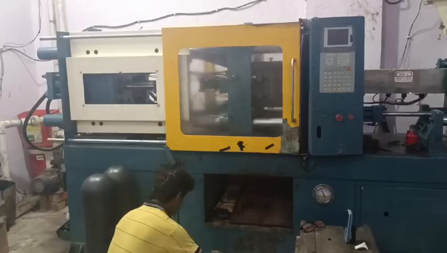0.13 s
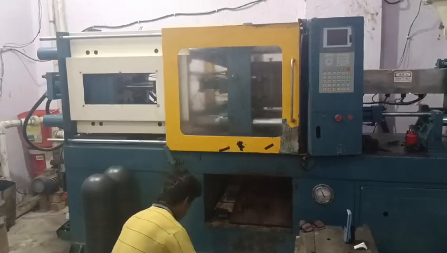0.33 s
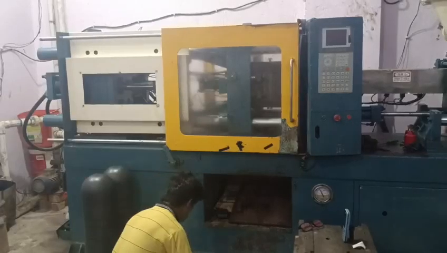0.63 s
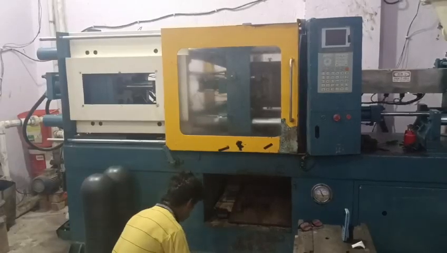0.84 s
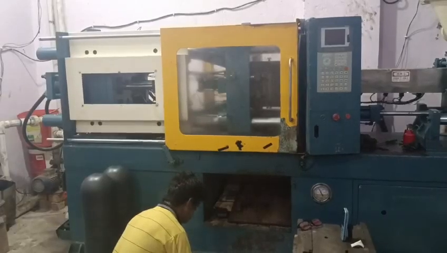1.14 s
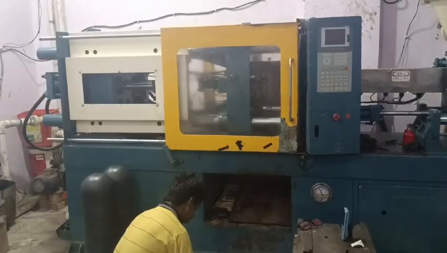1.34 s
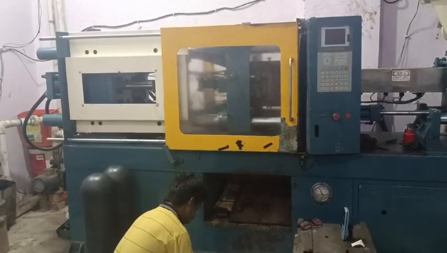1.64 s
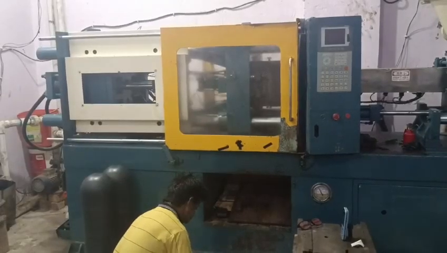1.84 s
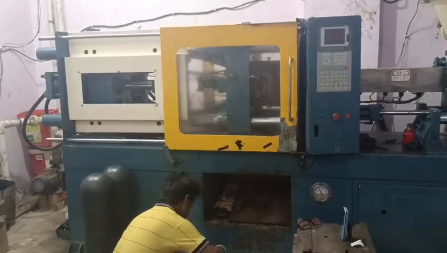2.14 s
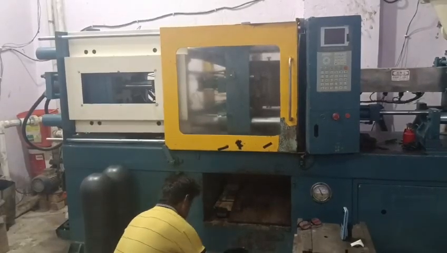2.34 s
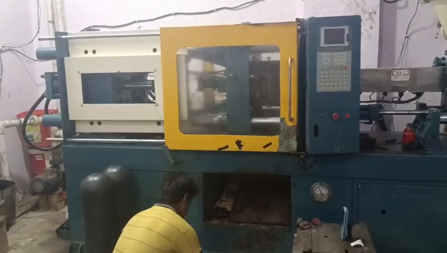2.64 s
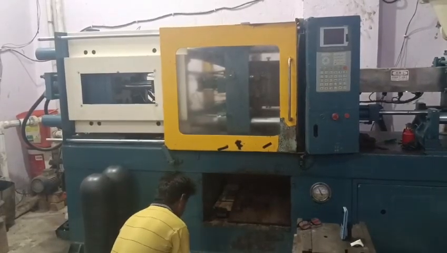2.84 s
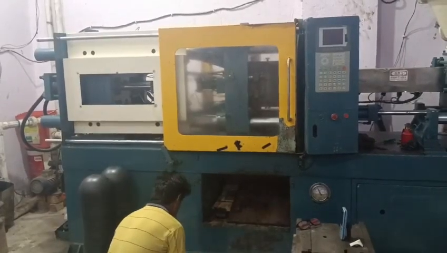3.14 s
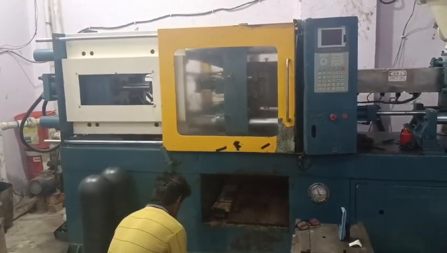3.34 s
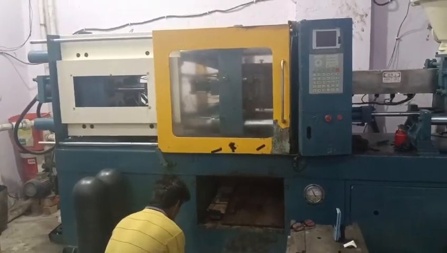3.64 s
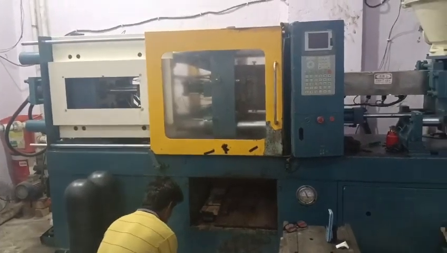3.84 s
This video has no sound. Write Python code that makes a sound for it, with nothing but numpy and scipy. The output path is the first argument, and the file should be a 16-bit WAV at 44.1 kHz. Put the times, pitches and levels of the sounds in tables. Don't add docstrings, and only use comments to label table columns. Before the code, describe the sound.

Steady pump hum, low rumble and oil hiss from a large machine; a small metallic click, a hard clank that bounces, then heavy deep thuds. Short room echo, phone microphone with gain dipping after the clank.

```python
import sys
import numpy as np
from scipy import signal
from scipy.fft import rfft, irfft, next_fast_len
from scipy.io import wavfile
from scipy.ndimage import uniform_filter1d

SR = 44100
rng = np.random.default_rng(int(sys.argv[2]) if len(sys.argv) > 2 else 0)


def volts_from_db(level):
    exponent = np.asarray(level, float) / 20
    return 10 ** exponent


def materialize(psi):
    bounded = np.clip(np.atleast_2d(psi).T, -1, 1)
    quanta = np.round(bounded * 32767).astype(np.int16)
    wavfile.write(sys.argv[1], SR, quanta)


N = 176400


def colour(x, table, power=1):
    hz, db = np.array(table, float).T
    size = next_fast_len(x.shape[-1])
    f = np.maximum(np.arange(size // 2 + 1) * SR / size, 1)
    gain = volts_from_db(power * np.interp(np.log(f), np.log(hz), db))
    return irfft(rfft(x, size) * gain, size)[..., :x.shape[-1]]


def level(x, db):
    return x * volts_from_db(db) / np.sqrt(np.mean(x ** 2))


def walk(rate):
    hold = int(SR / rate)
    steps = np.repeat(rng.standard_normal(N // hold + 1), hold)
    smooth = uniform_filter1d(uniform_filter1d(steps, hold), hold)
    return 1.29 * smooth[:N]


def ring(x, hz, width):
    return signal.lfilter(*signal.iirpeak(hz, hz / width, fs=SR), x)


def causal(table, size=SR // 4):
    hz, db = np.array(table, float).T
    f = np.maximum(np.arange(size // 2 + 1) * SR / size, 1)
    cepstrum = irfft(np.log(volts_from_db(np.interp(np.log(f), np.log(hz), db))), size)
    cepstrum[1:size // 2] *= 2
    cepstrum[size // 2 + 1:] = 0
    return irfft(np.exp(rfft(cepstrum)), size) * np.hanning(2 * size)[size:]


# pitch_hz [Hz], level_db [dB]
STEREO_WIDTH = [(60, -26), (110, -21), (200, -14), (380, -9), (700, -1), (1290, 1), (2380, 0), (15000, 0)]


def diffuse(size):
    mid, side = rng.standard_normal((2, size))
    side = colour(side, STEREO_WIDTH)
    return np.array([mid + side, mid - side])


def bed(table, db, swell):
    noise, out = colour(diffuse(N), table), 0
    lowest, highest = table[0][0], table[-1][0]
    for hz in lowest * 2 ** np.arange(0, np.log2(highest / lowest) + .5, .5):
        band_shape = [(hz / 2 ** .5, -60), (hz / 1.3, -9), (hz, 0), (hz * 1.3, -9), (hz * 2 ** .5, -60)]
        swell_db, flicker_db = 0.57 * swell, 1.5 * walk(9.16)
        out = out + colour(noise, band_shape) * volts_from_db(swell_db + flicker_db)
    return level(out, db)


# pitch_hz [Hz], level_db [dB per Hz]
RUMBLE_COLOUR = [(15, -59), (25, -27), (143, -3), (209, -5), (338, -8.5), (408, -17), (493, -13),
                 (605, -18), (1500, -21), (1950, -114), (3300, -120)]


def rumble(swell):
    return bed(RUMBLE_COLOUR, -28.5, swell)


# pitch_hz [Hz], level_db [dB per Hz]
OIL_COLOUR = [(1300, -65), (1500, -4), (2400, -3.5), (3000, -0.5), (3750, -3), (3950, -12.5), (6900, -12),
              (7250, -23), (7500, -46)]


def oil_hiss(swell):
    return bed(OIL_COLOUR, -32, swell)


# pitch_hz [Hz], level_db [dB per Hz]
AIR_COLOUR = [(7100, -40), (7300, 3), (8500, -2.5), (8850, -46), (9300, -10.5), (11500, -11), (13000, 4),
              (14700, -1.5)]


def air_hiss(swell):
    return bed(AIR_COLOUR, -48.5, swell)


# pitch_hz [Hz], level_db [dB rms]
HUM_TONES = [(156.1, -36.5), (263.8, -31), (312.2, -37), (344.5, -29), (500.6, -44), (683.7, -49.5),
             (732.1, -54), (834.4, -51)]
# pitch_hz [Hz], level_db [dB rms]
DRIVE_WHINE = [(6867, -50), (7132, -54), (7687, -69)]


def hum():
    wobble_db, pitch_drift = 1.78, 0.0016
    skirt_db, skirt_hz = -6, 22.3
    out = 0
    for hz, db in HUM_TONES + DRIVE_WHINE:
        drift = pitch_drift * min(1, 400 / hz) * walk(5.09)
        phase = 2 * np.pi * np.cumsum(hz * (1 + drift)) / SR + rng.uniform(0, 5.7)
        phase = phase + np.array([[0], [hz / 1500]])
        skirt = level(ring(rng.standard_normal(N), hz, skirt_hz), skirt_db)
        tone = 2 ** .5 * np.sin(phase) * volts_from_db(wobble_db * walk(6.83))
        out = out + volts_from_db(db) * (tone + skirt)
    return out


# centre_s [s], length_s [s], level_db [dB], pitch_hz [Hz]
LOW_SURGES = [
    (0.423, 0.23, -33.5, 77),
    (3.1, .04, -44, 60),
    (3.396, 0.19, -31, 107.3),
    (3.49, 0.08, -22, 88),
    (3.607, 0.045, -22, 189),
    (3.853, .12, -31, 69.5),
]


def surge():
    width_hz = 34
    t, out = np.arange(N) / SR, 0
    for centre, length, db, hz in LOW_SURGES:
        noise = ring(ring(rng.standard_normal(N), hz, width_hz), hz, width_hz)
        out = out + level(noise, db) * np.exp(-((t - centre) / length) ** 2)
    return out


def hall():
    t, noise = np.arange(SR) / SR, diffuse(SR)
    low = colour(noise, [(350, 0), (650, -50)])
    top = colour(noise, [(3500, -40), (8000, 0)])
    middle = noise - low - top
    tail = 0
    for band, t60_s in ((low, 0.45), (middle, 0.77), (top, 0.33)):
        tail = tail + band * volts_from_db(-60 * t / t60_s)
    tail = tail * (1 - np.exp(-t / 0.003))
    tail = tail * volts_from_db(7.5) / np.sqrt(np.sum(tail ** 2) / 2)
    direct = ring(signal.unit_impulse(SR), 2500, 6000)
    return tail + direct * np.array([[.9], [.8]])


def knock(blows, modes, crack, crack_db):
    clicks_per_s, click_spread_db = 700, 6
    t, push = np.arange(N) / SR, np.zeros(N)
    clicks = (rng.random(N) < clicks_per_s / SR) * rng.standard_normal(N)
    clicks = clicks * volts_from_db(click_spread_db * walk(60))
    for start, db, length, rattle_db, fade_db in blows:
        on = (t > start) & (t < start + length)
        rattle = volts_from_db(db + rattle_db - fade_db * on * (t - start))
        push += on * clicks * rattle / np.sqrt(clicks_per_s * length)
        push[int(start * SR)] += volts_from_db(db)
    unit, body = signal.unit_impulse(SR // 4), 0
    for k, (hz, width, db) in enumerate(modes):
        tone = ring(ring(ring(unit, hz, 2 * width), hz, 2 * width), hz, 2 * width)
        body = body + (-1) ** k * volts_from_db(db) * tone
    shape = level(body, 0) + level(causal(crack), crack_db)
    return signal.fftconvolve(push, shape * 12 / np.sqrt(SR // 4))[:N]


# start_s [s], level_db [dB], rattle_s [s], rattle_db [dB], fade_db [dB per s]
LATCH_HITS = [
    (1.883, -8, .04, -12, 40),
]
# pitch_hz [Hz], width_hz [Hz], level_db [dB]
LATCH_RINGING = [(755, 53, -7.5), (975, 92, -8), (1166, 84, -10), (2735, 230, -8), (3080, 270, -5.5),
                 (3220, 230, -5), (3390, 220, -1), (3770, 220, -1.5), (4080, 130, -13), (4270, 340, -14),
                 (4940, 210, -35), (6050, 290, -33), (7730, 500, -26)]
# pitch_hz [Hz], level_db [dB]
LATCH_SNAP = [(300, -10), (1200, 1.5), (2000, -15.5), (3500, 3), (7000, -13.5), (8800, -33), (13000, -22),
              (15500, -24)]


def latch():
    return knock(LATCH_HITS, LATCH_RINGING, LATCH_SNAP, -7.5)


# start_s [s], level_db [dB], rattle_s [s], rattle_db [dB], fade_db [dB per s]
PLATE_HITS = [
    (2.608, 1, 0.076, 0, 26),
    (2.629, -4.5, 0.019, -5.5, -2),
    (2.69, -8, .064, -1.5, -30),
]
# pitch_hz [Hz], width_hz [Hz], level_db [dB]
PLATE_RINGING = [(620, 105, -17), (736, 75, -7), (925, 120, -15.5), (1870, 170, -6.5), (2026, 90, 2.5),
                 (1953, 8.9, 7), (2064, 192, 1), (2236, 160, -7), (2350, 270, -5.5), (2565, 200, -4.5),
                 (2670, 140, -17), (3420, 170, -28), (4980, 250, -32), (5130, 560, -19.5)]
# pitch_hz [Hz], level_db [dB]
PLATE_SNAP = [(500, -40), (1300, -56), (1700, -21.5), (2200, 8), (3800, -8), (4050, -19), (5300, -17),
              (8800, -43), (13000, -22), (15500, -29)][:]


def plate():
    return knock(PLATE_HITS, PLATE_RINGING, PLATE_SNAP, -9)


# start_s [s], level_db [dB], rattle_s [s], rattle_db [dB], fade_db [dB per s]
STOP_HITS = [
    (3.457, -13.5, 0.036, -6, 50),
]
# pitch_hz [Hz], width_hz [Hz], level_db [dB]
STOP_RINGING = [(90, 30, -4), (145, 41, 10.5), (373, 82, -11), (476, 110, 4), (1840, 640, -27)]


def stop():
    return knock(STOP_HITS, STOP_RINGING, CLAMP_SNAP, 2)


# start_s [s], level_db [dB], rattle_s [s], rattle_db [dB], fade_db [dB per s]
CLAMP_HITS = [
    (3.5, -22, .07, 4.7, -4),
    (3.578, -13, 0.058, 4.8, 25),
    (3.66, -20.5, .1, 2.6, 120),
]
# pitch_hz [Hz], width_hz [Hz], level_db [dB]
CLAMP_RINGING = [(87.4, 35, -11), (175, 19.5, 20.5), (229, 95, 3), (310, 65, -11), (444, 100, -7),
                 (1037, 400, -12.5), (1800, 170, -25), (3080, 610, -24)]
# pitch_hz [Hz], level_db [dB]
CLAMP_SNAP = [(30, -29), (50, 7.5), (250, 8.5), (600, -9.5), (1500, -16), (3500, -25.5), (4200, -30.5),
              (8000, -55)]


def clamp():
    return knock(CLAMP_HITS, CLAMP_RINGING, CLAMP_SNAP, 1.5)


def scene():
    swell = walk(1.32)
    steady = rumble(swell) + oil_hiss(swell) + air_hiss(swell) + hum()
    hits = latch() + plate() + clamp() + stop()
    return steady + surge() + signal.fftconvolve(hits[None], hall(), axes=1)[:, :N]


# pitch_hz [Hz], level_db [dB]
TREBLE_SLOPE = [(60, 0.0), (110, 0.0), (200, 0.0), (380, -0.5), (700, -1.0), (1290, -2.5), (2380, -4.5),
                (4400, -6.5), (8120, -6.0), (15000, -6.5)]


def microphones(x):
    x = np.array([colour(x[0], TREBLE_SLOPE, 0.58), colour(x[1], TREBLE_SLOPE, -0.54)])
    return colour(x, [(18, -24), (40, 0), (14650, -0.5), (14850, -11)])


# time_s [s], level_db [dB]
PHONE_GAIN = [(.16, -30), (.175, -6.5), (.29, -0.5), (.5, 1), (1.06, 1.5), (1.12, -2), (1.875, -0.5),
              (1.89, -1.5), (2.2, -3), (2.6, -2.5), (2.615, -9), (3.1, -11.5), (3.4, -8.5), (3.58, -4),
              (3.66, -7.5), (4, -8)]


def gain_control(x):
    t = np.arange(N) / SR
    return x * volts_from_db(np.interp(t, *np.array(PHONE_GAIN).T)) * (t > 0.158)


def top_cut(x):
    return signal.sosfilt(signal.butter(12, 15810, fs=SR, output="sos"), x)


def record(dry):
    mix = np.clip(gain_control(microphones(dry)), -1, 1)
    return top_cut(mix)


dry = scene()
out = record(dry)
materialize(out)
```